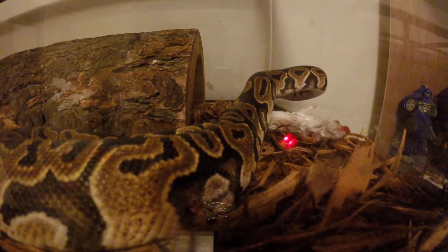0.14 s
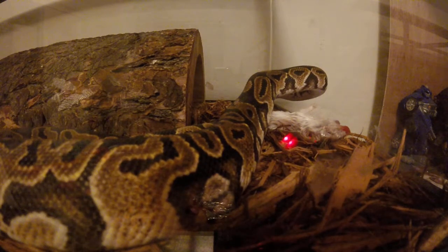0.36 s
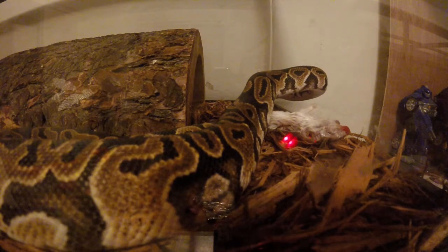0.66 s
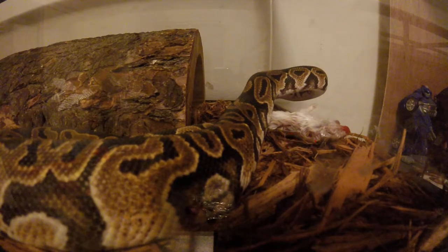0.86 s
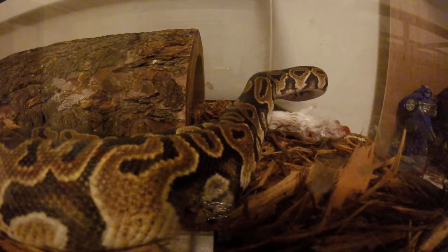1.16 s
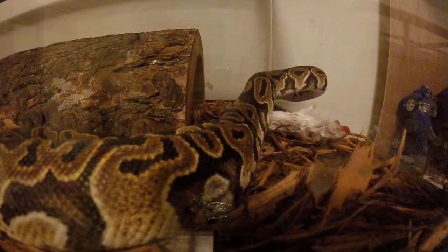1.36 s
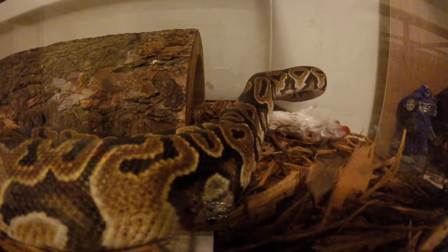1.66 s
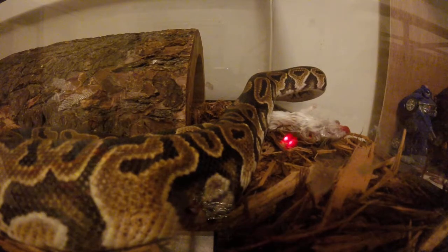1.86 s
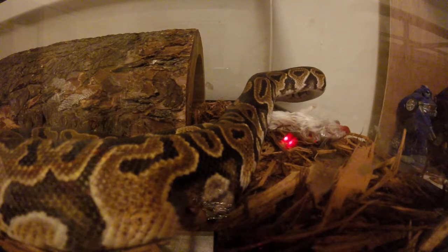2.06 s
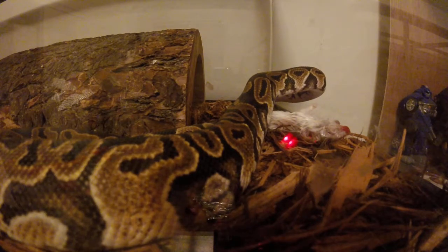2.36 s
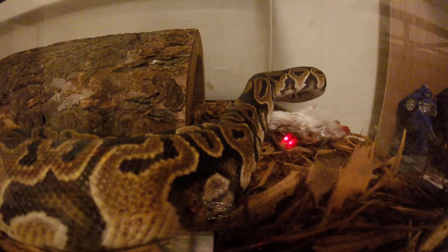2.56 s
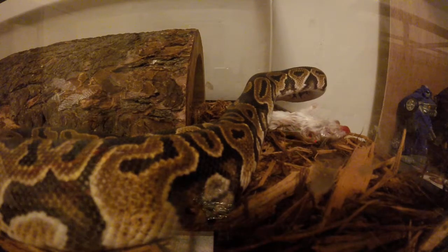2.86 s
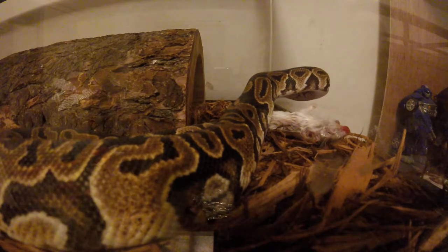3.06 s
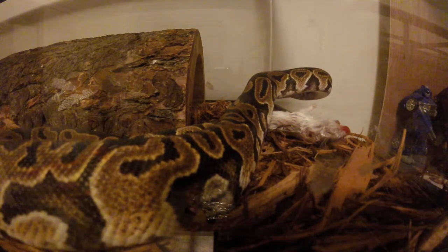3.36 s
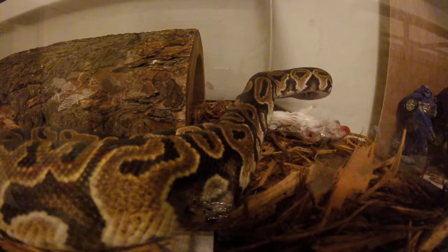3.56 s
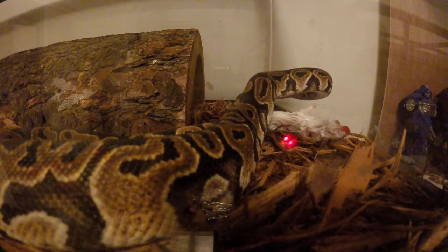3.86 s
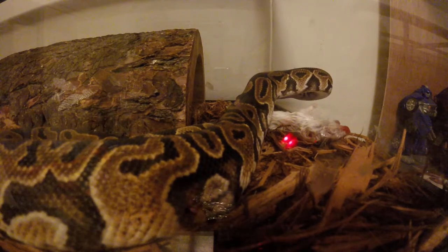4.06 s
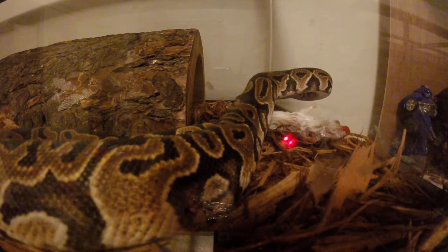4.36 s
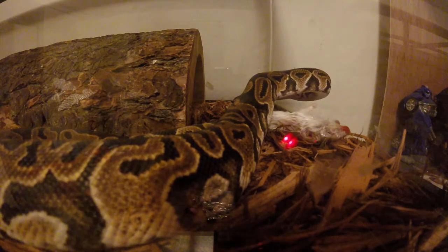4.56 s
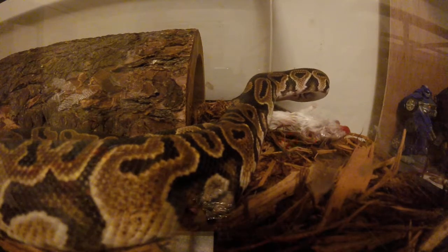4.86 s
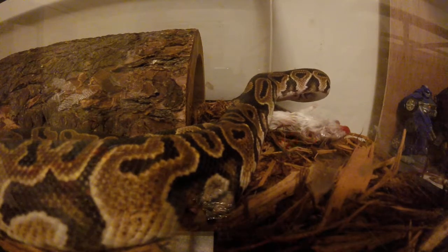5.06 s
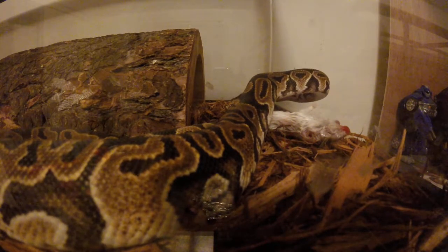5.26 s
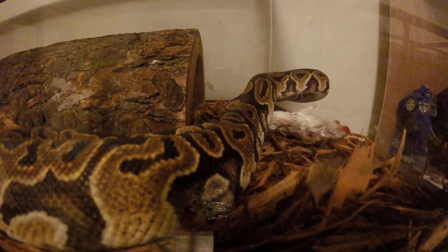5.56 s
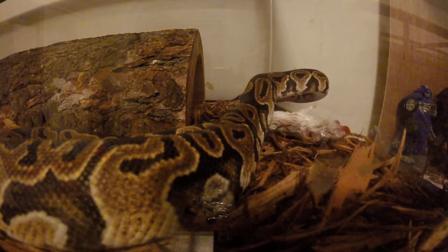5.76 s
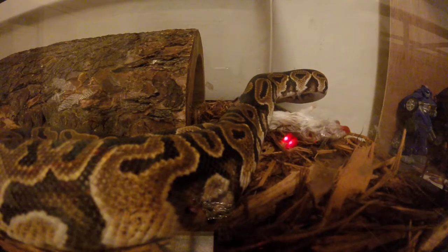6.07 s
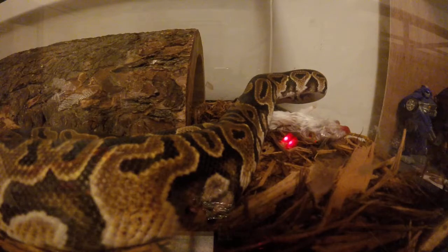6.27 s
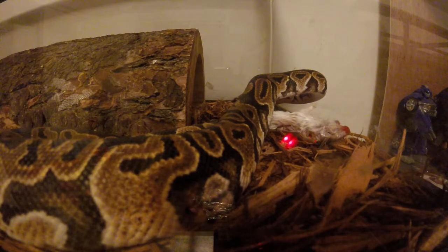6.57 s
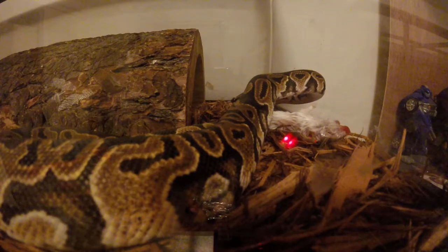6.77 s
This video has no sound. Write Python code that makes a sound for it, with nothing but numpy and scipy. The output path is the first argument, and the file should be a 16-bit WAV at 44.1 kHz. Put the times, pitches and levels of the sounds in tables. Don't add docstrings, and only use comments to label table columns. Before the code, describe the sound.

Irregular dull knocks, rubs and dry bedding crackles inside a glass pet tank, with two heavy low thumps over faint rumble and hiss.

```python
import sys
import numpy as np
from scipy import signal
from scipy.fft import rfft, irfft, next_fast_len
from scipy.io import wavfile
from scipy.ndimage import uniform_filter1d

SR = 44100
rng = np.random.default_rng(int(sys.argv[2]) if len(sys.argv) > 2 else 0)


def elevation(decibels):
    levels = np.asarray(decibels, float)
    return 10 ** (levels / 20)


def master(y):
    cut = np.clip(np.atleast_2d(y).T, -1, 1)
    pcm = np.round(cut * 32767)
    wavfile.write(sys.argv[1], SR, pcm.astype(np.int16))


N = 305345

# (f/Hz, level/dB per Hz)
CASE = [(120, 1), (200, -8.5), (278, -2), (420, -4.5), (715, -2.5), (783, -2.5), (1230, -8), (1360, -11.5),
        (1550, -24), (2200, -25.5), (2860, -53), (4840, -120)]
# (f/Hz, level/dB per Hz)
CHIPS = [(880, -4), (1500, 1), (2090, -5.5), (2890, -4), (3050, -3), (3290, -3), (3570, -1), (3990, -6.5),
         (5610, -7.5), (7330, -12), (8820, -13), (10800, -22.5), (13600, -33)]


def evened(x):
    return x / np.sqrt(np.mean(x ** 2) + 1e-20)


def add(mix, s, sound):
    part = mix[round(s * SR):][:len(sound)]
    part += sound[:len(part)]


def coloured(x, points):
    size = next_fast_len(x.shape[-1] + 2048)
    f, db = np.transpose(points)
    hz = np.fft.rfftfreq(size, 1 / SR) + 1
    gain = elevation(np.interp(np.log(hz), np.log(f), db, -90, -90))
    return irfft(rfft(x, size) * gain, size)[..., :x.shape[-1]]


def resonate(x, hz, width):
    turn = np.exp(2j * np.pi * np.cumsum(hz * np.ones(len(x))) / SR)
    r = np.exp(-np.pi * width / SR)
    return 2 * (turn * signal.lfilter([1 - r], [1, -r], x / turn)).real


def grit(shape, spread_db, clump):
    jumps = uniform_filter1d(rng.standard_normal(shape), clump, axis=-1) * np.sqrt(clump)
    return rng.standard_normal(shape) * elevation(spread_db * np.minimum(jumps, 1.8))


def pieces(slips, ring_hz, knots_db, slope_db):
    hz = np.fft.rfftfreq(slips.shape[1], 1 / SR) + 1
    knots = evened(uniform_filter1d(rng.standard_normal((len(slips), len(hz))), size=90))
    octaves_away = abs(np.log2(hz / ring_hz[:, None]))
    return irfft(rfft(slips) * elevation(knots_db * knots - slope_db * octaves_away))


def kind(events, *shared):
    return [(*row[:3], *shared, *row[3:]) for row in events]


def contacts(events, body, spread_db, knots_db, slope_db, sharp, rise, tick_db, gain_db):
    t, out = np.arange(SR // 3) / SR, np.zeros(N)
    slips = grit((len(events), len(t)), spread_db, clump=60)
    bodies = coloured(pieces(slips, np.transpose(events)[2], knots_db, slope_db), body)
    for (s, db, hz, ring_db, hold, t60), slip, plain in zip(events, slips, bodies):
        ring = resonate(resonate(slip, hz, hz / sharp), hz, 39.0 * hz / sharp)
        ring_fade = elevation(ring_db - 60 * t / .5)
        sound = evened(evened(plain) + ring_fade * evened(ring))
        onset = 1 - np.exp(-t / max(rise * hold ** 2, 8e-4))
        strike = 1 + elevation(tick_db) * np.exp(-t / 0.00075)
        fade = elevation(-60 * np.maximum(t - hold, 0) / max(t60, .02)) * (1 - t / t[-1])
        add(out, s - .002, elevation(db + gain_db) * onset * strike * fade * sound)
    return out


def knocks():
    # (t/s, peak level/dB, ring f/Hz, 60 dB decay/s)
    short_knocks = [(0.404, -38, 420, 0.45), (0.625, -35.5, 400, 0.68), (0.72, -42, 376, 0.82),
                    (1.816, -36.5, 750, 0.29), (1.859, -38.5, 934, 0.18), (1.939, -51, 990, 0.21),
                    (1.991, -32, 910, 0.15), (2.017, -24.5, 1260, 0.13), (2.388, -43, 880, 0.099),
                    (2.473, -27.5, 900, 0.26), (2.865, -45.5, 1010, 0.2), (2.956, -50.5, 674, 0.1),
                    (3.154, -38, 960, 0.52), (3.492, -47, 620, 0.32), (3.785, -30.5, 776, 0.23),
                    (3.989, -28, 1070, 0.46), (5.255, -42, 940, 0.14), (5.447, -31, 955, 0.7),
                    (5.807, -42, 310, 0.25), (5.87, -46.5, 850, 0.34), (6.002, -42, 520, 0.41),
                    (6.84, -52.5, 770, 0.22)]
    # (t/s, peak level/dB, ring f/Hz, 60 dB decay/s)
    long_rubs = [(0.295, -39.5, 410, 0.16), (0.357, -34.5, 394, 0.3), (0.788, -31, 880, 0.26),
                 (0.829, -32, 820, 0.66), (1.37, -49.5, 800, 0.69), (1.48, -45, 795, 0.26),
                 (1.66, -53, 775, 0.35), (2.56, -51, 1000, 0.85), (3.192, -28, 930, 0.2),
                 (3.692, -34, 563, 0.33), (3.89, -33, 720, 0.073), (3.954, -42, 650, 0.25),
                 (4.105, -25.5, 1060, 0.21), (4.129, -29.5, 646, 0.29), (4.718, -52, 910, 0.33),
                 (4.988, -35, 910, 0.36), (5.529, -42.5, 394, 0.6), (5.627, -37, 280, 0.078),
                 (6.163, -37.5, 300, 0.32), (6.329, -42.5, 327, 0.85), (6.44, -38.5, 865, 0.34)]
    # (t/s, peak level/dB, centre f/Hz, 60 dB decay/s)
    dead_scuffs = [(0.495, -33, 910, 0.12), (0.58, -39, 776, 0.24), (1.136, -33, 600, 0.34),
                   (1.774, -41.5, 674, 0.12), (2.037, -23, 685, 0.31), (3.33, -22.5, 1013, 0.12),
                   (3.554, -42, 680, 0.18), (3.638, -40, 670, 0.48), (4.01, -25, 640, 0.23),
                   (3.805, -23, 603, 0.26), (4.219, -36.5, 624, 0.19), (5.668, -41, 533, 0.22),
                   (6.229, -42, 624, 0.27), (6.476, -31, 990, 0.21)]
    dull = kind(short_knocks, -3, 0.011) + kind(long_rubs, -9, 0.027) + kind(dead_scuffs, -18, .016)
    return contacts(dull, CASE, spread_db=2.0, knots_db=3.0, slope_db=2.5, sharp=12.0, rise=3.0,
                    tick_db=-1.0, gain_db=-10.5)


def crackles():
    # (t/s, peak level/dB, centre f/Hz)
    broad_bursts = [(0.402, -49, 3700), (0.7994, -55, 3420), (3.8965, -39.5, 2400), (5.5292, -48.5, 3000),
                    (1.1388, -44, 1900), (1.822, -49.5, 3640), (2.0258, -33.5, 3100), (2.0674, -41.5, 3130),
                    (2.3902, -38.5, 3500), (2.4757, -37, 3210), (2.8644, -50.5, 2090),
                    (3.1935, -35.5, 2260), (3.3302, -31, 5300), (3.809, -35, 3800), (4.1004, -30.5, 3940),
                    (4.1297, -35.5, 3680), (5.4474, -34, 4060), (5.85, -57, 2200), (6.0003, -53.5, 3640),
                    (6.0696, -54, 2190), (6.1649, -54, 2200), (6.2282, -51, 3450), (6.474, -43, 3080)]
    # (t/s, peak level/dB, ring f/Hz)
    snaps = [(0.4985, -34.5, 3120), (0.834, -42.5, 3420), (1.8608, -49, 3500), (1.911, -52, 2400),
             (3.702, -53, 2300), (4.7195, -51, 3500), (4.9866, -45.5, 2170), (5.2604, -52.5, 2090),
             (0.501, -44, 4700), (2.36, -45, 2390), (2.4, -47, 4830)]
    # (t/s, peak level/dB, centre f/Hz, 60 dB decay/s)
    crushes = [(0.6994, -51.5, 3360, 0.27), (0.785, -43.5, 3440, 0.26), (1.772, -52, 2160, .27),
               (1.988, -36.5, 2390, 0.28), (2.343, -41.5, 2400, .45), (3.023, -56, 3510, 0.55),
               (3.1554, -41.5, 3520, 0.3), (3.784, -39, 2170, 0.25), (3.9923, -35, 1950, 0.2),
               (4.015, -34, 3340, 0.26), (6.4494, -48, 3340, 0.52), (4.16, -46, 3400, 0.43),
               (5.63, -54.5, 3000, .4), (.655, -50.5, 3650, .3), (3.635, -53.5, 3500, 0.37),
               (2.325, -48, 2400, .3)]
    dry_chips = kind(broad_bursts, -33, 0.014, 0.24) + kind(snaps, -4, 0.012, 0.24)
    dry_chips = dry_chips + kind(crushes, -13, 0.032)
    return contacts(dry_chips, CHIPS, spread_db=1.0, knots_db=1.8, slope_db=2.0, sharp=15.0, rise=9.8,
                    tick_db=-4, gain_db=-13.0)


def raps():
    # (t/s, peak level/dB, ring f/Hz, 60 dB decay/s)
    blows = [(0.357, -21.5, 421.5, 0.11), (0.408, -25.5, 363, 0.071), (0.632, -36, 600, 0.037),
             (1.147, -30, 640, 0.026), (1.817, -40, 700, 0.1), (1.86, -34, 948, 0.09),
             (1.994, -25, 996, 0.061), (2.017, -23.5, 757, 0.21), (2.388, -35.5, 946, 0.095),
             (2.473, -24, 937, 0.059), (3.194, -16.5, 860, 0.025), (3.785, -38, 577, 0.15),
             (3.958, -35, 800, 0.037), (3.988, -33, 988, 0.079), (4.105, -20, 1100, 0.024),
             (4.988, -26.5, 896, 0.03), (5.26, -36, 1212, 0.099), (5.448, -26, 872, 0.088),
             (0.367, -26.5, 395, 0.08), (3.334, -32, 1010, 0.092), (3.811, -24.5, 515, 0.09),
             (4.13, -27.5, 654, 0.19), (6.001, -37, 527, .1), (6.85, -55, 806, 0.18),
             (2.042, -29, 269, 0.22), (3.722, -27.5, 650, 0.046), (5.63, -43, 287, 0.073),
             (6.167, -36, 300, .1), (5.872, -44, 870, .06), (6.315, -41, 322, 0.077),
             (6.678, -52, 500, 0.064), (2.045, -24, 600, 0.037), (3.912, -32, 750, .03),
             (5.67, -44, 534, .06), (6.232, -39, 620, .06)]
    t, out = np.arange(SR // 5) / SR, np.zeros(N)
    for s, db, hz, t60 in blows:
        overtone = 0.39 * np.sin(2 * np.pi * 1.4 * hz * t) * elevation(-60 * t / 0.12)
        ring = np.sin(2 * np.pi * hz * t) + overtone
        soft = 1 - np.exp(-t / 6e-4)
        add(out, s - .002, elevation(db - 7.5 - 60 * t / max(t60, .02)) * soft * ring)
    return out


def thumps():
    # (t/s, peak level/dB, pitch f/Hz, push length/s)
    heavy = [
        (3.3245, -16.5, 122, .029),
        (4.0068, -18, 111, .033),
    ]
    # (t/s, peak level/dB, pitch f/Hz, push length/s)
    light = [(0.289, -51, 72.7, 0.02), (0.355, -42.5, 152, 0.02), (0.507, -44.5, 167, 0.021),
             (0.718, -47, 101, 0.021), (0.8, -40, 127, 0.045), (1.099, -54, 104, 0.027),
             (1.549, -55, 139, 0.037), (1.82, -48, 124.4, 0.043), (2.034, -30.5, 145, 0.012),
             (2.081, -35.5, 157, 0.022), (3.198, -42, 118.6, 0.03), (3.357, -29, 96, 0.01),
             (3.41, -34, 109, 0.028), (3.481, -40, 107, 0.017), (3.515, -37, 129, 0.03),
             (3.805, -33.5, 105, 0.026), (4.041, -29.5, 114, 0.022), (4.157, -34, 120, 0.033),
             (4.213, -38.5, 122, 0.06), (4.991, -35.5, 96, 0.026), (5.469, -53, 126, 0.051),
             (5.558, -48, 115, 0.031), (5.641, -44.5, 137, 0.043), (5.797, -38.5, 118, 0.028),
             (5.852, -40.5, 114, 0.044), (6.067, -45.5, 105, 0.023), (6.24, -46, 149, 0.026),
             (6.345, -41.5, 119, 0.018), (6.479, -34.5, 106, 0.022), (6.505, -41, 110, 0.032)]
    t, out = np.arange(SR // 2) / SR, np.zeros(N)
    blows = heavy + light
    for (s, db, hz, push), air in zip(blows, rng.standard_normal((len(blows), len(t)))):
        progress = np.clip(t / max(push, .01), 0, 1) ** 1.3
        swell = np.sin(np.pi * (.12 + .88 * progress))
        blow = swell * np.sin(2 * np.pi * hz * t)
        echo_db = -12 - 0.26 * (db + 23.5)
        echo = evened(resonate(resonate(air, hz, 85), hz, 84))
        echo = echo * progress ** 2 * elevation(echo_db - 60 * t / 0.36)
        add(out, s, elevation(db) * (blow + echo))
    return out


def glides(rubs, sharp, taper):
    out = np.zeros(N)
    for (s, length, from_hz, to_hz, db), rub in zip(rubs, rng.standard_normal((len(rubs), SR // 2))):
        size = round(length * SR)
        hz, width = np.linspace(from_hz, to_hz, size), from_hz / sharp
        band = resonate(resonate(rub[:size], hz, width), hz, width)
        add(out, s, elevation(db) * evened(band) * signal.windows.tukey(size, taper))
    return out


def squeaks():
    # (t/s, length/s, start f/Hz, end f/Hz, level/dB)
    narrow_rubs = [(0.52, 0.09, 3200, 3000, -68), (.65, 0.11, 3700, 3500, -73),
                   (2.55, .15, 3600, 3600, -74), (2.995, 0.15, 3550, 3200, -63.5),
                   (.65, 0.097, 8000, 8100, -73), (3.03, .07, 6900, 6700, -80),
                   (4.99, 0.025, 3700, 3500, -70), (5.26, .03, 3700, 3500, -72),
                   (0.91, 0.2, 1450, 1150, -62), (5.254, .035, 1800, 1800, -68),
                   (3.403, 0.27, 1420, 1420, -66)]
    return glides(narrow_rubs, sharp=7.5, taper=.6)


def swishes():
    # (t/s, length/s, start f/Hz, end f/Hz, level/dB)
    soft_strokes = [(3.01, .11, 6900, 6300, -72), (.86, 0.18, 3400, 3500, -70),
                    (.95, 0.38, 930, 810, -61.5), (1.66, 0.11, 800, 800, -69), (.6, .18, 3500, 3600, -70),
                    (2.8, .14, 1400, 1250, -63), (2.85, 0.055, 1500, 1150, -74),
                    (4.02, .05, 5200, 6000, -56), (3.7, .06, 3000, 2600, -66.5),
                    (5.5, 0.096, 3000, 2900, -66), (2.06, .1, 350, 320, -51.5), (6.4, .12, 330, 270, -59),
                    (4.2, 0.074, 290, 280, -53.5), (1.99, 0.09, 10000, 10000, -65),
                    (2.472, 0.037, 11000, 11000, -67.5), (4.098, .05, 11000, 9900, -61),
                    (5.446, 0.035, 11500, 11000, -67), (1.136, 0.032, 8500, 8500, -67),
                    (6.476, 0.028, 10500, 10500, -69.5), (5.45, 0.13, 1400, 1300, -58),
                    (2.475, 0.078, 820, 760, -48), (4.14, .04, 570, 550, -43.5),
                    (3.5, .13, 880, 920, -59.5), (6.31, .1, 1230, 1170, -61.5), (.3, 0.11, 3300, 3500, -73),
                    (3, .13, 3600, 3200, -66), (.36, .09, 520, 480, -48.5), (3.325, .05, 204, 190, -36.5),
                    (.78, 0.032, 1000, 930, -50)]
    return glides(soft_strokes, sharp=3, taper=.8)


def rings():
    # (t/s, length/s, ring f/Hz, level/dB)
    scraped = [(.497, .025, 3100, -45), (.497, 0.029, 4580, -52), (.525, .06, 3050, -59),
               (2.028, 0.041, 3130, -55), (2.024, 0.044, 5600, -54.5), (2.03, .025, 6900, -58),
               (2.07, .045, 3130, -61), (1.91, .03, 3500, -62), (1.86, .02, 3700, -63),
               (1.94, 0.045, 1000, -54.5), (3.332, 0.047, 5100, -58), (3.193, 0.037, 3640, -53),
               (5.45, 0.028, 3900, -55), (.834, 0.081, 2450, -60), (.834, 0.068, 3500, -58),
               (2.355, 0.032, 2400, -53.5), (2.36, 0.044, 3730, -56), (2.395, .04, 4750, -59),
               (4.716, 0.025, 3500, -60), (3.33, .03, 1100, -41), (4.105, 0.036, 3700, -56),
               (5.47, .04, 610, -45), (3.555, 0.022, 1500, -59), (6.838, 0.033, 800, -52),
               (3.325, .02, 950, -36), (3.956, .02, 1120, -46), (.622, .02, 750, -48),
               (2.388, .02, 880, -44), (4.987, 0.019, 3600, -58), (4.8, .02, 3570, -62)]
    t, out = np.arange(SR // 5) / SR, np.zeros(N)
    for (s, length, hz, db), rub in zip(scraped, rng.standard_normal((len(scraped), len(t)))):
        width = hz / 10
        note = evened(resonate(resonate(rub, hz, width), hz, width))
        fade = elevation(db - 17 * (t / max(length, .01)) ** 2)
        add(out, s, fade * (1 - np.exp(-t / 0.0027)) * note)
    return out


def sliding():
    # (t/s, level/dB)
    effort = [(0.0, -66), (0.5, -48), (0.69, -46.5), (0.77, -39), (0.94, -53.5), (1.52, -63.5),
              (1.97, -45.5), (2.14, -69), (2.4, -53.5), (2.83, -62), (3.22, -55.5), (3.33, -35.5),
              (3.62, -64), (4.06, -33), (4.3, -63), (5.41, -60.5), (6.38, -54), (6.92, -64.5)]
    effort_db = np.interp(np.arange(N) / SR, *np.transpose(effort))
    dull, bright = grit((2, N), 2.5, clump=150)
    bright_db = -75.5 + 0.55 * (effort_db + 56)
    through_case = elevation(effort_db - 10.5) * evened(coloured(dull, CASE))
    return through_case + elevation(bright_db) * evened(coloured(bright, CHIPS))


def room():
    # (t/s, rise/dB, length/s)
    lurches = [(0.02, 7, 0.13), (0.624, 4, 0.29), (1.385, -12, .05), (2.09, 17.5, 0.087), (2.773, 5, 0.054),
               (2.933, -14, .05), (3.35, 5.5, 0.19), (4.05, 14, 0.19), (5.034, 12, 0.033),
               (5.51, 6.5, 0.052), (5.877, -4, 0.039), (6.196, 7, 0.15), (6.515, 7, 0.09),
               (6.69, -13, 0.05), (6.853, 5.5, 0.14)]
    # (f/Hz, level/dB per Hz)
    hiss_tone = [(16, -30), (34, -1.5), (49, -1.5), (455, -20.5), (780, -25.5), (892, -24.5), (1610, -30),
                 (3520, -35), (8120, -44.5), (12500, -53.5), (16200, -66), (22000, -120)]
    low, hiss = rng.standard_normal((2, N))
    rumble = coloured(low, [(20, -30), (36, -5.5), (50, -9.0), (75, -14.5), (110, -31.0)])
    t = np.arange(N) / SR
    sway_db = sum(db * np.exp(-((t - s) / length) ** 2) for s, db, length in lurches)
    return elevation(-57 + sway_db) * evened(rumble) + elevation(-54.5) * evened(coloured(hiss, hiss_tone))


def scene():
    hits = knocks() + crackles() + raps() + thumps()
    strokes = squeaks() + swishes() + rings()
    return (hits + strokes + sliding() + room())[None]


def top_cut(x):
    return signal.sosfilt(signal.butter(12, 14890, fs=SR, output="sos"), x)


def record(dry):
    return top_cut(dry)


dry = scene()
out = record(dry)
master(out)
```